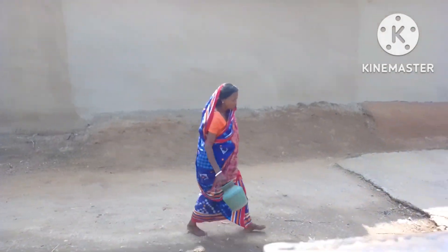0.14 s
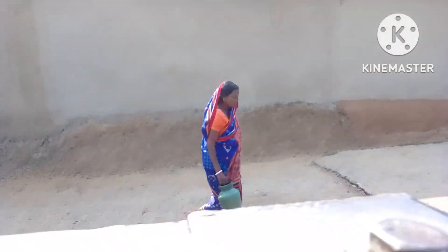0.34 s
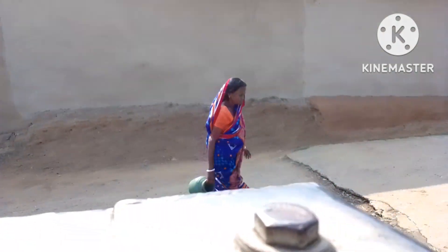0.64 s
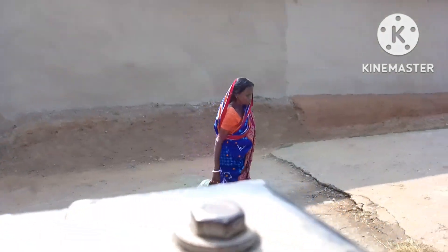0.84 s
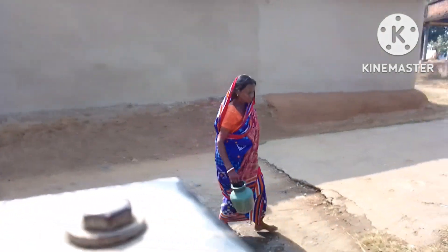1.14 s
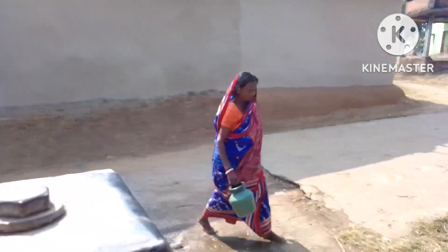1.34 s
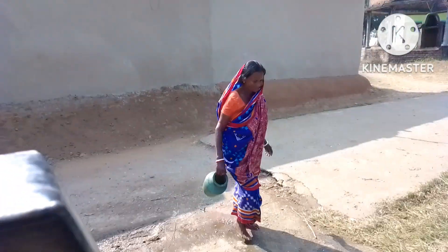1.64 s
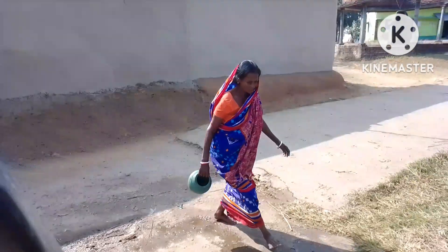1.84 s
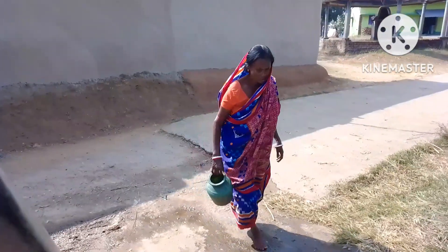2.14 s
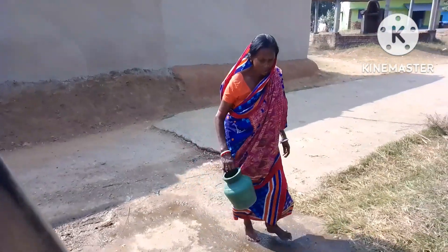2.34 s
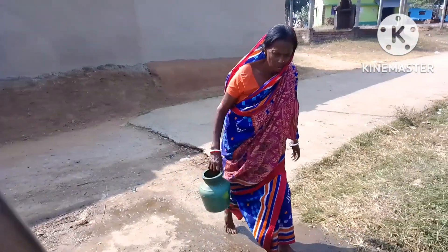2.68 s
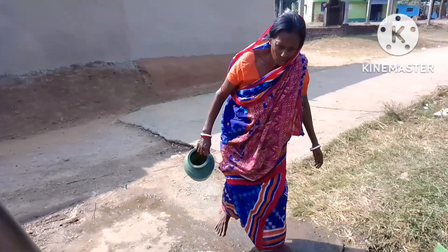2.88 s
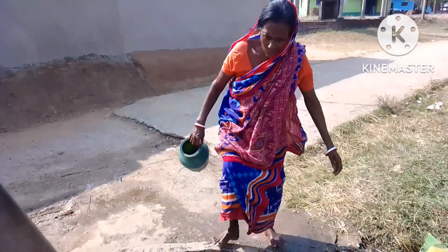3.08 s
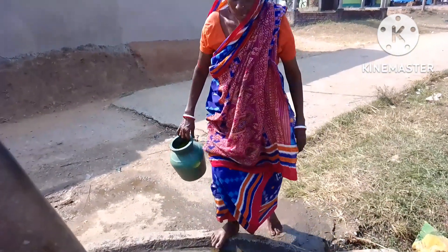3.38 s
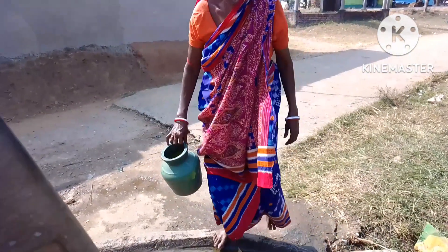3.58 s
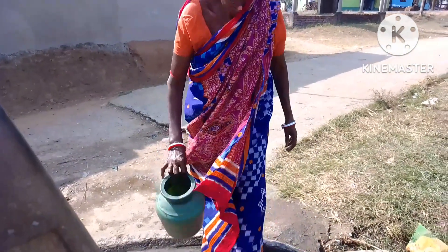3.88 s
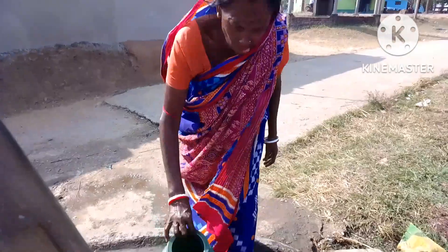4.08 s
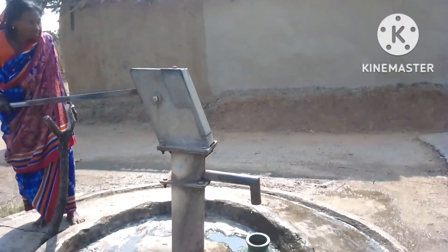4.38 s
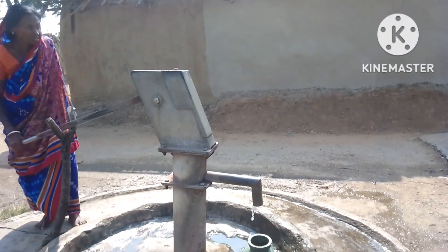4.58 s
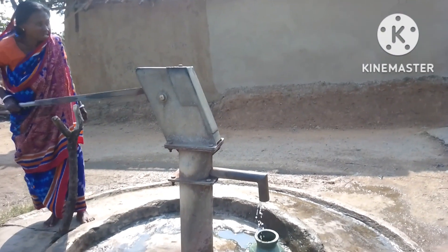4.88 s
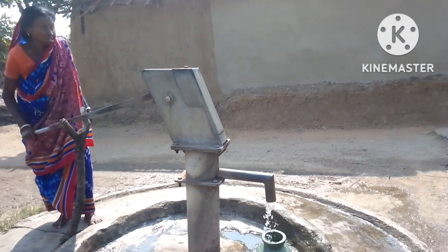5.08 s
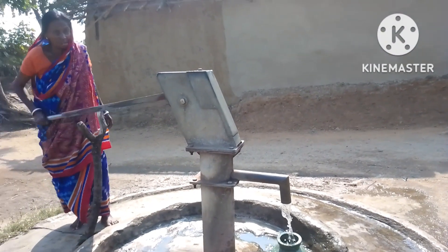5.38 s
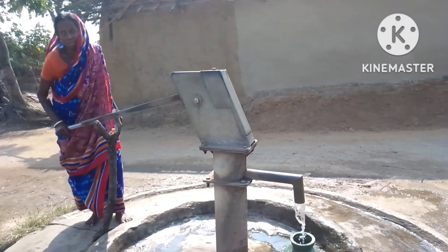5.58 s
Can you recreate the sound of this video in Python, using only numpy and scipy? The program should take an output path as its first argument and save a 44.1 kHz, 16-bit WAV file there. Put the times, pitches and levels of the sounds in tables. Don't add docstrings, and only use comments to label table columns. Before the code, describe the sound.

First a low motorbike hum climbs for under two seconds, easing off briefly near the end, then drops to dead silence for an instant. Next, close up and dry, a hand pump is worked in steady strokes, with loud irregular metal knocks, scraping and loose rattling. Water trickles and splashes, hollow pot gulps emerge, and far engines throb faintly outdoors.

```python
import sys
import numpy as np
from scipy import signal
from scipy.fft import rfft, irfft, next_fast_len
from scipy.io import wavfile
from scipy.ndimage import uniform_filter1d, map_coordinates

SR = 44100
rng = np.random.default_rng(int(sys.argv[2]) if len(sys.argv) > 2 else 0)


def store_pcm(level_fs):
    pcm = np.round(np.clip(level_fs, -1, 1) * 32767).astype(np.int16)
    wavfile.write(sys.argv[1], SR, np.atleast_2d(pcm).T)


def decibels_to_gain(level_db):
    exponent = np.asarray(level_db, float) / 20
    return 10 ** exponent


N = 252252
T = np.arange(N) / SR
GAP_START_S, CUT_S = 1.6741, 1.7241

# start in seconds, blow on the rod in dB,
# rod note in Hz, knock in the head in dB, head note in Hz.
STOPS = [(1.846, -35.5, 798, -32.5, 4440), (2.181, -27.5, 1790, -27.5, 2950),
         (2.398, -30.5, 800, -38, 4420), (2.6583, -21.5, 1790, -15.5, 5470), (2.939, -32, 781, -32, 4100),
         (3.199, -22, 1795, -17.5, 4560), (3.494, -37.5, 777, -35, 2800), (3.796, -33.5, 757, -22, 2800),
         (4.054, -25.5, 1330, -28.5, 4320), (4.314, -30, 1334, -23, 2370), (4.602, -24, 1342, -53, 4300),
         (4.865, -27.5, 1210, -16, 2390), (5.1445, -29, 783, -23.5, 4260), (5.447, -35, 1470, -39, 3770),
         (5.69, -38, 900, -55, 2800)]
# time in seconds, effort in dB, stream in dB, upper edge of the head's sound
# in Hz, drag of the rod in its guide in dB.
WORK = [(1.79, -66, -83, 6840, -57), (1.85, -57, -79, 6960, -60.5), (2.1, -62, -77, 7000, -47.5),
        (2.4, -57.5, -79, 6340, -55), (2.7, -52, -65.5, 5500, -48.5), (2.86, -50.5, -68, 5700, -53),
        (3.0, -45, -65.5, 4600, -53), (3.45, -44.5, -69.5, 4600, -49.5), (3.75, -43, -64.5, 4580, -50.5),
        (3.94, -44.5, -69.5, 4480, -55), (4.15, -44.5, -66, 4740, -46.5), (4.45, -46, -72, 4840, -52),
        (4.7, -46, -69.5, 4930, -49.5), (5.0, -46.5, -71, 4740, -48), (5.3, -44.5, -70, 4580, -50),
        (5.52, -46, -76, 4300, -54), (5.64, -49.5, -74, 4100, -41), (5.69, -50, -76, 4240, -44),
        (5.72, -59, -82, 3800, -45)]
# start in seconds, peak in dB, own note in Hz.
THUDS = [(1.963, -29, 1560), (1.971, -24, 1090), (2.016, -29, 1520), (2.024, -25.5, 786), (2.07, -43, 1290),
         (2.082, -24, 1840), (1.812, -33, 1420), (1.828, -34, 1000), (1.84, -28.5, 800), (1.752, -42, 900),
         (1.85, -47, 1700), (1.98, -25.5, 1690), (2.439, -36, 940), (4.515, -37, 1270), (2.108, -21, 1290),
         (2.287, -28, 1150), (2.521, -23, 1085), (2.611, -25, 765), (2.731, -24.5, 1090),
         (2.824, -25.5, 1450), (2.991, -22.5, 1170), (3.074, -36, 800), (3.452, -32, 1290),
         (3.734, -33, 1780), (3.763, -26, 1430), (3.875, -20.5, 1610), (3.97, -27, 1270),
         (4.026, -26, 1760), (4.176, -42, 1247), (4.442, -44, 1330), (4.719, -28, 1070), (4.764, -41, 770),
         (4.815, -27, 760), (4.97, -26.5, 793), (5.074, -31, 1340)]
# start in seconds, peak in dB, own note in Hz, 60 dB decay in seconds.
KNOCKS = [(1.9276, -32.5, 2450, 0.14), (2.083, -33, 4700, 0.11), (2.146, -30.5, 2620, 0.082),
          (2.282, -37, 3900, 0.024), (2.35, -31, 4100, 0.031), (2.619, -36, 2540, 0.059),
          (2.723, -26.5, 4000, 0.099), (2.808, -29, 4720, 0.056), (2.8326, -27, 5400, 0.078),
          (2.971, -25.5, 4320, 0.082), (3.082, -26, 2480, 0.042), (3.0989, -15.5, 3940, 0.013),
          (3.1787, -19, 3920, 0.025), (3.35, -34, 2930, 0.15), (3.307, -31.5, 3850, 0.064),
          (3.327, -22, 4100, 0.018), (3.3701, -29, 3940, 0.13), (3.616, -29, 2400, 0.059),
          (3.5495, -25.5, 2820, 0.044), (3.7524, -26.5, 2430, 0.17), (3.974, -38, 3620, 0.23),
          (4.085, -32, 3740, 0.088), (4.2036, -24.5, 4300, 0.029), (4.6518, -37, 4240, 0.14),
          (4.695, -25.5, 2330, 0.051), (4.8967, -22, 4360, 0.12), (4.97, -28.5, 2360, 0.097),
          (5.175, -28, 3500, 0.059), (5.247, -31, 4400, 0.16), (5.41, -23.5, 3950, 0.032)]
# start in seconds, peak in dB, note in Hz,
# 60 dB decay in seconds.
RINGS = [(1.955, -35, 5320, 0.11), (2.017, -30.5, 2420, 0.12), (2.108, -31, 5200, 0.047),
         (2.32, -35, 6350, 0.022), (2.535, -38, 5500, 0.044), (4.733, -46, 2340, 0.067),
         (3.799, -23.5, 2687, 0.12), (4.162, -34, 2383, 0.33), (4.695, -30, 2383, 0.14),
         (4.725, -40, 2383, 0.083), (2.068, -30, 1294, 0.19), (4.44, -32, 1285, 0.12),
         (4.514, -33, 1315, 0.14), (4.765, -34, 783, 0.26), (2.855, -45, 1480, 0.15),
         (3.355, -37, 2950, 0.17), (5.225, -36.5, 2083, 0.69)]
# centre in Hz, width in Hz, level in dB.
ROD_MODES = [(510.8, 5.8, 7.5), (561.6, 6, 10.5), (777, 14, 5.5), (822, 1.7, 8.5), (979, 4.1, -5),
             (1036, 3.4, 7.5), (1105, 5.3, -9), (1146, 6.5, 5), (1270, 34, -17), (1344, 47, 1.5),
             (1606, 2.8, -9.5), (1790, 21, 5.5)]
HEAD_MODES = [(2383, 28, 15.5), (2420, 60, 14.5), (2687, 6.7, 12), (3950, 15, 9), (4080, 11.7, 9),
              (4620, 150, 8), (4860, 84, -28), (5800, 46, -21), (4500, 15, -19), (6250, 170, -18)]
# frequency in Hz, level in dB.
ROD_SKIN = [(350, -61), (520, -5.5), (900, -5), (1400, 0.5), (2000, -5.5), (3000, -11.5), (5500, -53)]
HEAD_SKIN = [(1200, -7.5), (2200, -5.5), (3200, -7.5), (4400, 1.5), (5400, -1), (6400, -7.5), (7000, -16),
             (9000, -50)]
# dB over the control, swing in dB, crest in strokes after the lower stop.
SCRAPE, RATTLE, GUSH = (0.17, 1.96, 0.38), (-0.096, 0.83, 0.22), (0.1, 1.7, 0.68)


def pump():
    effort_db, _, _, drag_db = curves(WORK)
    scrape_db = over_stroke(drag_db, SCRAPE)
    rattle_db = over_stroke(effort_db, RATTLE)

    rod_blows = [(s, db, hz, 0.25 * 800 / hz) for s, db, hz, _, _ in STOPS]
    rod_blows += [(*row, 0.035) for row in THUDS]
    thuds, low_notes = blows(rod_blows, note_db=-13.0, q=94, broad=0.23, rise_s=0.0012)
    head_blows = [(s, db, hz, 0.11) for s, _, _, db, hz in STOPS] + KNOCKS
    knocks, high_notes = blows(head_blows, note_db=-16.5, q=40, broad=0.86, rise_s=0.00025)
    strikes, songs = blows(RINGS, note_db=-14.0, q=220, broad=3.0)

    drag = decibels_to_gain(scrape_db + 1.8 * wobble(11)) * grit(rate=140, spread_db=47.0, t60=0.038)
    rattle = decibels_to_gain(rattle_db - 3.0 + 1.8 * wobble(27)) * grit(rate=300, spread_db=22.0, t60=0.023)
    bubbles = decibels_to_gain(rattle_db - 5.0) * drops(count=5000, hz=3780, spread=0.294, cycles=11.6, size_db=3.5)

    rod = patchy(drag, depth_db=2.5, size=(4, 6)) + decibels_to_gain(-19.5) * thuds
    head = patchy(rattle, depth_db=2.5, size=(4, 5)) + decibels_to_gain(-16.5) * (knocks + strikes)
    ringing_head = iron(head, HEAD_MODES, HEAD_SKIN, ring_db=-4.0)
    top = dulled(ringing_head + bubbles + high_notes + songs, slope_db=54.0, shelf_db=-34.0)
    return iron(rod, ROD_MODES, ROD_SKIN, ring_db=6) + top + low_notes


# start in seconds, peak in dB, centre
# in Hz.
CRACKS = [(1.849, -39.5, 3300), (2.144, -42, 4140), (2.519, -36, 2280), (2.891, -44, 3500),
          (3.122, -36, 3500), (4.545, -34.5, 4250), (4.722, -39, 2000), (2.0799, -33.5, 3880),
          (2.1796, -34.5, 3960), (2.373, -43, 5000), (2.6564, -20, 4740), (2.711, -27.5, 4000),
          (3.197, -21.5, 4500), (3.51, -27, 4050), (4.312, -23, 4460), (4.602, -40, 2300),
          (4.651, -30, 3770), (4.8649, -17, 4850), (4.8755, -20, 4700), (5.142, -21, 4330),
          (2.11, -35, 1400), (2.18, -31, 2650), (2.398, -34, 1100), (3.756, -32.5, 4080),
          (3.797, -24.5, 2550), (4.0529, -26.5, 1350), (4.073, -33, 4000), (4.087, -32, 3900),
          (5.076, -36, 4000), (5.18, -30.5, 3720), (5.305, -33, 2500), (5.34, -37, 1590),
          (4.866, -26, 2370)]
# start in seconds, peak in dB.
SPITS = [
    (5.4955, -60),
    (5.5603, -53),
    (5.58, -57),
    (5.59, -54),
]


def cracks():
    _, bursts = blows([(*row, 0.03) for row in CRACKS], note_db=-1.0, q=4.5, broad=0.1, rise_s=0.0025)
    spit_rows = [(*row, 7000, 0.004) for row in SPITS]
    spits, _ = blows(spit_rows, note_db=0, q=4, broad=0.05, rise_s=0.0003)
    return dulled(bursts, slope_db=46, shelf_db=-29, scale=0.98) + spits


# start in seconds, peak in dB, own note in Hz.
LINKS = [(1.9081, -44, 2400), (2.0814, -45, 4450), (2.4834, -52, 2180), (2.5098, -34.5, 4500),
         (2.527, -37, 4460), (2.5945, -40, 4340), (2.6932, -26, 4070), (2.8738, -31.5, 4400),
         (2.9188, -39, 4300), (2.99, -30, 3780), (3.0396, -48, 4120), (3.047, -32, 3760),
         (3.124, -32, 4270), (3.398, -35, 2900), (3.4237, -35, 4400), (3.5828, -39, 3700),
         (3.6521, -45, 2960), (3.669, -31.5, 4280), (3.9215, -43, 3750), (4.0292, -29.5, 4000),
         (4.1126, -34, 3730), (4.1458, -34, 2460), (4.2537, -38, 2900), (4.3734, -31, 4100),
         (4.675, -31.5, 3900), (4.6926, -26, 4260), (4.714, -31, 4300), (4.7344, -43, 2390),
         (4.7723, -29, 4080), (4.9284, -28.5, 3950), (5.0545, -33, 4200), (5.121, -33.5, 4250),
         (5.231, -27.5, 2270), (5.394, -32, 4000), (5.4849, -33, 3900), (5.59, -32, 2320),
         (5.639, -33, 2400)]
# start in seconds, peak in dB, own note in Hz,
# 60 dB decay in seconds.
JARS = [(1.848, -50, 2780, 0.049), (1.964, -44, 2800, 0.063), (2.282, -38, 5200, 0.027),
        (2.545, -35.5, 2470, .08), (2.6564, -25.5, 3500, 0.075), (3.181, -29, 4300, .04),
        (4.603, -32, 2210, 0.095), (4.866, -29, 2370, 0.056), (5.177, -27, 1820, .06),
        (5.601, -36, 2920, 0.17), (5.655, -33.5, 2590, 0.13)]


def chain():
    rows = [(*row, 0.076) for row in LINKS] + JARS
    taps, notes = blows(rows, note_db=-14.5, q=26, broad=0.3, rise_s=0.00082)
    through_head = iron(decibels_to_gain(-19) * taps, HEAD_MODES, HEAD_SKIN, ring_db=-9)
    return dulled(through_head + notes, slope_db=67, shelf_db=-33)


# start in seconds, peak in dB, note in Hz, length in cycles.
PLIPS = [(1.978, -30, 372, 1.5), (2.309, -39, 3560, 7), (2.711, -27, 3120, 3.4), (3.222, -21.5, 2770, 5.8),
         (3.4833, -23, 2900, 2.8), (3.511, -21, 2600, 4.3), (3.7972, -22, 2470, 7.3),
         (3.88, -20.5, 2220, 0.96), (4.546, -29, 4020, 8.4), (4.5653, -31, 4000, 13), (4.723, -35, 1900, 3),
         (4.825, -29, 2350, 10), (5.4475, -14.5, 2580, 0.43), (5.591, -23, 4000, 0.86),
         (5.497, -23, 2200, 0.65), (3.306, -24, 4020, 3.8), (3.974, -31, 3670, 6.2), (2.52, -27, 2150, 1.8),
         (4.091, -29, 4150, 5), (4.116, -28, 3800, 5), (4.678, -26, 4600, 2.7), (5.512, -29.5, 2680, 6.2),
         (5.562, -23, 3980, 0.69), (2.284, -38, 4270, 3.4), (2.81, -31, 4320, 3.1)]


def plips():
    out, t = np.zeros(N + SR), T[:SR // 10]
    for s, db, hz, cycles in PLIPS:
        u = hz * t / cycles
        swell = u * np.exp(1 - 2 * u)
        rough = 1 + 0.59 * rng.standard_normal(len(t))
        tone = np.sin(2 * np.pi * hz * t * (1 + 0.014 * u))
        out[round(s * SR):][:len(t)] += decibels_to_gain(db + 1.0) * swell * rough * tone
    return filtered(out[:N], lambda f: 1 / (1 + (f / 5200) ** 14))


# start in seconds, peak in dB.
SLAPS = [(2.2826, -55), (2.3485, -57), (2.517, -55), (2.5979, -54), (2.686, -46), (2.755, -61),
         (2.837, -47), (2.8753, -51), (2.991, -51), (3.132, -52), (3.1766, -54), (3.5333, -53),
         (4.087, -60), (4.1858, -56), (4.2581, -61), (4.4148, -53), (4.5679, -52), (4.7565, -56),
         (4.8952, -49), (4.9497, -58), (5.0154, -59), (5.0595, -60), (5.2271, -60), (5.255, -61),
         (5.3807, -61), (5.41, -48.5), (5.6641, -62)]
# frequency in Hz, level in dB per Hz.
SPRAY = [(4500, 0.5), (6500, 2.5), (8000, -11.5), (9400, -1), (10400, -2.5), (11300, 0.5), (12500, 0),
         (13200, -7), (15000, -11), (16000, -30)]


def splash():
    shaken = [(s, db - 29) for s, _, _, db, _ in STOPS]
    rows = [(s, db, 10000, 0.05) for s, db in shaken + SLAPS]
    slaps, _ = blows(rows, note_db=0, q=4, broad=0.061)
    _, stream_db, _, _ = curves(WORK)
    hiss = decibels_to_gain(over_stroke(stream_db, GUSH)) * grit(rate=100, spread_db=6, t60=0.0096)
    spray = colour(hiss + decibels_to_gain(-5.5) * slaps, SPRAY)
    return dulled(spray, slope_db=39.5, shelf_db=-15.0, scale=3.0)


# time in seconds, air note in Hz, level in dB.
POT = [
    (1.73, 262, -71),
    (2.6, 262.7, -63),
    (4.1, 264.7, -58.5),
    (4.8, 271.8, -50),
    (5.72, 288.4, -47.5),
]
# start in seconds, peak in dB, note in Hz.
GULPS = [(4.305, -38.5, 274), (4.838, -41, 274), (4.88, -60, 254), (5.028, -30.5, 271), (5.066, -33, 260),
         (5.164, -40, 236), (5.289, -31, 293), (5.409, -31, 274), (5.445, -32.5, 278), (5.4999, -23, 282),
         (5.525, -28.5, 282), (5.543, -33, 290), (5.622, -34.5, 300), (5.635, -34, 280)]


def pot():
    pole = decibels_to_gain(-60 / (0.09 * SR))
    jolts = rng.standard_normal(N) + 1j * rng.standard_normal(N)
    sway = signal.lfilter([1], np.convolve([1, -pole], [1, -pole ** 10]), jolts)
    air_hz, air_db = curves(POT)
    air = unit(np.real(sway * np.exp(2j * np.pi * np.cumsum(air_hz) / SR)))
    out = decibels_to_gain(air_db + 2.9 * wobble(14)) * air
    for s, db, hz in GULPS:
        at = round((s - 0.003) * SR)
        t = T[:SR // 4][:N - at]
        swell = decibels_to_gain(db + 3.5 - 60 * t / 0.062) * (1 - np.exp(-t / 0.0035))
        out[at:at + len(t)] += swell * np.sin(2 * np.pi * hz * t * (1 + 1.0 * t))
    return out


# time in seconds, firing rate in Hz,
# throttle in dB.
BIKE = [
    (0.0, 40.36, -1.5),
    (0.35, 47.56, 2),
    (0.76, 56.07, -0.5),
    (1.2, 66.82, 1),
    (1.36, 66.97, 1),
    (1.46, 67.1, -9.5),
    (1.666, 59.63, -1.5),
    (1.8, 59.8, 1.5),
    (1.86, 54, -20),
]
# multiple of the firing rate, dB in the lane, dB after the cut.
STRONG_ORDERS = [(2, -43, -62), (3, -47.5, -43.5), (4, -54, -81)]
# multiple of the firing rate, level in dB.
WEAK_ORDERS = [(1, -55), (3.5, -63.5), (5, -68), (10.5, -73.5), (12.3, -69.5), (14.4, -78), (15.7, -67)]
# frequency in Hz, level in dB.
PIPE = [(80, -20.5), (108, -2), (190, -0.5), (230, -4.5), (280, -4)]
# frequency in Hz, level in dB per Hz.
LANE = [(25, -6), (60, -0.5), (130, -7.5), (230, -6.5), (400, -22.5), (720, -18.5), (1200, -24.5),
        (3000, -28), (3850, -28), (4600, -32), (5000, -40), (5800, -38), (7500, -33.5), (8600, -32.5),
        (9000, -41), (12500, -59.5), (15000, -59)]
TYRES = [(5800, -40), (7000, -2), (8000, 0), (8650, -2), (8900, -20), (10500, -19), (12000, -50)]


def bike():
    hz, throttle_db = curves(BIKE)
    first = T < CUT_S
    turn = 2 * np.pi * np.cumsum(hz * (1 + 0.0022 * wobble(25.4))) / SR
    push_db = throttle_db + 1.5 * np.cos(2 * np.pi * 4.73 * (T - 0.557))
    strong, weak = np.zeros(N), np.zeros(N)
    for k, near_db, far_db in STRONG_ORDERS:
        order_db = push_db + along(PIPE, k * hz) + np.where(first, near_db, far_db)
        strong += decibels_to_gain(order_db + 1.9 * wobble(8.34)) * np.sin(k * turn + k)
    for k, db in WEAK_ORDERS:
        case_db = 10 / (1 + ((k * hz - 680) / 44) ** 2)
        phase = rng.uniform(0, 2 * np.pi)
        weak += decibels_to_gain(db + case_db + 1.1 * wobble(7.3)) * np.sin(k * turn + phase)

    noise = (1 + 0.094 * np.cos(turn)) * rng.standard_normal(N)
    lane_peak_db = -48
    near_lane_db = lane_peak_db - 6 * abs(T - 1.197) + 1.03 * wobble(6.9)
    lane_db = np.where(first, near_lane_db, -62)
    lane = decibels_to_gain(lane_db) * colour(noise, LANE)
    tyres = decibels_to_gain(-69 - 8 * abs(T - 1.2)) * colour(noise[::-1], TYRES) * first
    fade = np.clip((BIKE[-1][0] - T) / 0.032, 0, 1)
    return strong * fade + weak * first * decibels_to_gain(1.4 * (lane_db - lane_peak_db)) + lane + tyres


# start in seconds, peak in dB, centre in Hz, snap in dB.
TICKS = [
    (0.067, -66, 3920, -55),
    (0.1845, -54, 4230, -56),
    (0.2314, -70, 3620, -75),
    (0.2554, -65, 3610, -70),
    (0.376, -68, 3940, -54),
    (0.4758, -53.5, 3770, -82),
    (0.5016, -54, 4600, -80),
    (1.528, -50, 5080, -52.5),
]


def ticks():
    note_rows = [(s, db, hz, 0.04) for s, db, hz, _ in TICKS]
    _, notes = blows(note_rows, note_db=-0.5, q=7, broad=0.068, rise_s=0.0018)
    snap, _ = blows([(s, db, 10000, 0.015) for s, _, _, db in TICKS], note_db=0, q=4, broad=0.05)
    return notes + colour(snap, [(6000, -5), (9500, 0), (15000, -24)])


# time in seconds, firing rate in Hz.
PULLING = [
    (1.8, 19),
    (2.15, 19.3),
    (2.6, 21.2),
    (3.05, 23.2),
    (3.4, 24.6),
    (3.78, 20.1),
    (4.1, 19.9),
    (5, 21.6),
    (5.72, 22.4),
]
# time in seconds, pulling engine in dB, idling engine in dB.
CARRY = [
    (1.75, -50, -65),
    (1.95, -51, -58),
    (3.05, -45.5, -50),
    (3.2, -53.5, -52.5),
    (3.5, -50.5, -46.5),
    (4.05, -43.5, -52),
    (4.4, -47, -46),
    (4.9, -53, -46.5),
    (5.3, -51.5, -50.5),
    (5.72, -50, -51),
]
# frequency in Hz, level in dB per Hz.
RUMBLE = [(15, -47), (25, -1), (32, -12.5), (76, -6), (113, -4.5), (150, 1), (170, 0), (226, -13),
          (256, -11.5), (480, -11.5), (620, -63), (1060, -120)]


def rumble():
    pull, idle = decibels_to_gain(curves(CARRY))
    roar = unit(decibels_to_gain(1.9 * wobble(18)) * colour(rng.standard_normal(N), RUMBLE))
    pulling = pull * beat(curves(PULLING)[0], firing_s=2.272)
    idling = idle * beat(np.full(N, 17.5), firing_s=4.774)
    return pulling + idling + decibels_to_gain(-3) * np.hypot(pull, idle) * roar


def beat(hz, firing_s):
    turn = 2 * np.pi * np.cumsum(hz) / SR
    turn = turn - np.interp(firing_s, T, turn) + 0.15 * wobble(8)
    out = np.zeros(N)
    for k in range(2, 13):
        level = decibels_to_gain(along(RUMBLE, k * hz) + 1.45 * wobble(2.87))
        out += level * np.cos(k * turn + 0.37 * wobble(2.01))
    return unit(out)


def blows(table, note_db, q, broad, rise_s=0.00059):
    bursts, notes, t = np.zeros(N + SR), np.zeros(N + SR), np.arange(SR // 4) / SR
    for s, db, hz, t60 in table:
        decay = decibels_to_gain(-60 * t / t60) + 0.15 * decibels_to_gain(-20 * t / t60)
        fall = decay * (1 - np.exp(-t / rise_s))
        noise = rng.standard_normal(len(t))
        narrow = np.clip(broad * decibels_to_gain(-0.6 * (db + 21)), 0.5, 10)
        lean = unit(signal.lfilter(*signal.iirpeak(hz, narrow, SR), noise))
        blur = unit(signal.lfilter(*signal.iirpeak(hz, q, SR), lean))
        at = round(s * SR)
        bursts[at:][:len(t)] += decibels_to_gain(db) * fall * lean
        notes[at:][:len(t)] += decibels_to_gain(db + note_db) * fall * blur
    return bursts[:N], notes[:N]


def iron(x, modes, skin, ring_db):
    def response(f):
        ring = 0
        for k, (centre, width, db) in enumerate(modes):
            mode = 1j * f * width / (centre * centre - f * f + 1j * f * width)
            ring = ring + (-1) ** k * decibels_to_gain(db) * mode
        return unit(decibels_to_gain(along(skin, f))) * (1 + decibels_to_gain(ring_db) * ring)
    return filtered(x, response)


def grit(rate, spread_db, t60):
    jolts = (rng.random(N) < rate / SR) * decibels_to_gain(spread_db * np.tanh(rng.standard_normal(N)))
    shape = signal.lfilter([1], [1, -decibels_to_gain(-60 / (t60 * SR))], jolts)
    return unit((unit(shape) + 1.9) * rng.standard_normal(N))


def drops(count, hz, spread, cycles, size_db):
    when, pitch, size = rng.random(count), rng.standard_normal(count), rng.standard_normal(count)
    f, t = (hz * np.exp(spread * pitch))[:, None], np.arange(400) / SR
    u = f * t / cycles
    swell = np.exp(-u) * (1 - np.exp(-8 * u))
    note = decibels_to_gain(size_db * size)[:, None] * swell * np.sin(2 * np.pi * f * t * (1 + 0.0038 * u))
    at = (when * N).astype(int)[:, None] + np.arange(len(t))
    return unit(np.bincount(at.ravel(), note.ravel(), N + len(t))[:N])


def over_stroke(control_db, layer):
    strokes = np.interp(T, [row[0] for row in STOPS], np.arange(len(STOPS)) / 2)
    db, swing_db, crest = layer
    return control_db + db + swing_db * np.cos(2 * np.pi * (strokes - crest))


def dulled(x, slope_db, shelf_db, scale=1):
    hz, t, z = signal.stft(x, SR, nperseg=512)
    edge_hz = scale * np.interp(t, T, curves(WORK)[2])
    octaves_over = np.log2(np.maximum(hz[:, None] / edge_hz, 1))
    gain = decibels_to_gain(-slope_db * octaves_over) + decibels_to_gain(shelf_db)
    return signal.istft(z * gain, SR, nperseg=512)[1][:N]


def patchy(x, depth_db, size):
    z = signal.stft(x, nperseg=256)[2]
    field = uniform_filter1d(rng.standard_normal(z.shape), size[0], 0)
    field = unit(uniform_filter1d(field, size[1], 1))
    gain = decibels_to_gain(depth_db * field - depth_db ** 2 / 5.8)
    return signal.istft(z * gain, nperseg=256)[1][:N]


def colour(x, spectrum):
    return filtered(x, lambda hz: unit(decibels_to_gain(along(spectrum, hz))))


def filtered(x, response):
    m = next_fast_len(N + SR // 2)
    return irfft(rfft(x, m) * response(np.fft.rfftfreq(m, 1 / SR)), m)[:N]


def wobble(rate):
    return map_coordinates(rng.standard_normal(int(N * rate / SR) + 4), [T * rate])


def curves(rows):
    s, *cols = np.transpose(rows)
    return [np.interp(T, s, c) for c in cols]


def along(points, hz):
    f, v = np.transpose(points)
    return np.interp(np.log(hz + 1), np.log(f + 1), v)


def unit(x):
    return x / np.sqrt(np.mean(x ** 2) + 1e-20)


def scene():
    lane = bike() + ticks()
    metal = pump() + cracks() + chain()
    water = plips() + patchy(splash(), depth_db=2.0, size=(9, 4)) + pot()
    close = metal + water + rumble()
    return (lane + (T >= CUT_S) * close)[None]


def band_limit(x):
    return signal.sosfilt(signal.butter(12, 15480, fs=SR, output="sos"), x)


def record(dry):
    on = (T < GAP_START_S) | (T >= CUT_S)
    offset = 0.02
    mix = (dry + offset) * on
    return band_limit(mix)


dry = scene()
out = record(dry)
store_pcm(out)
```